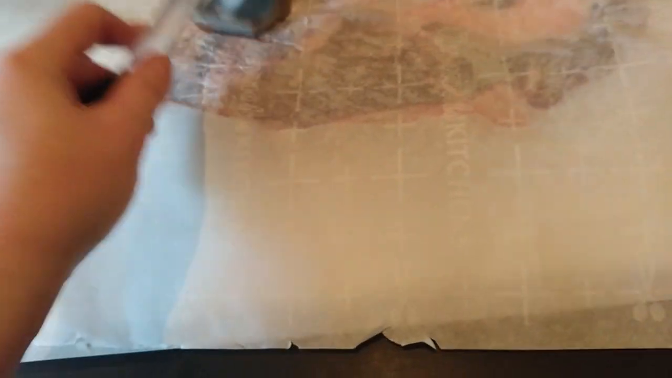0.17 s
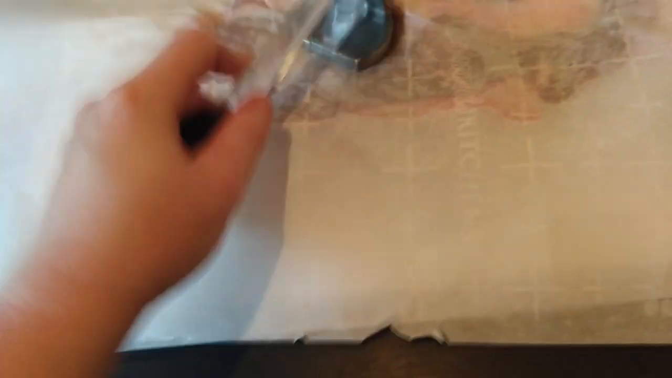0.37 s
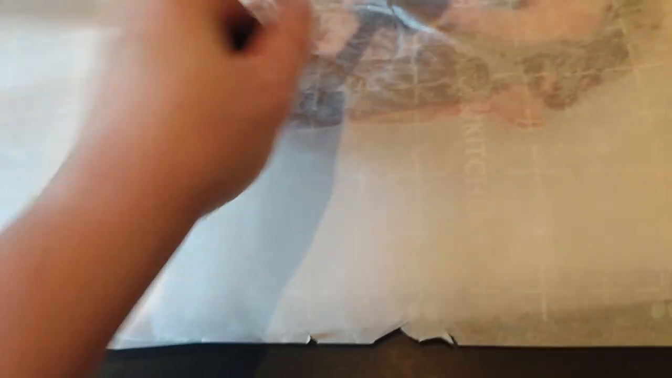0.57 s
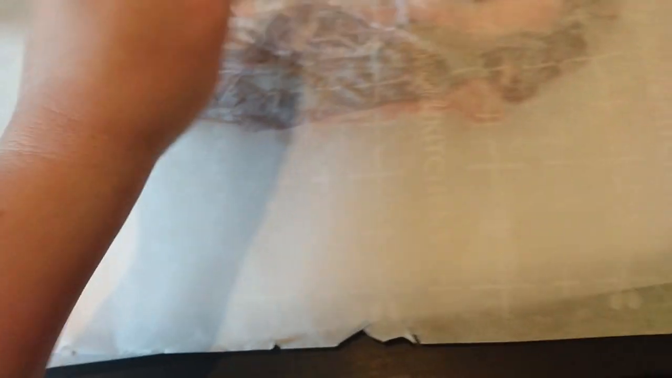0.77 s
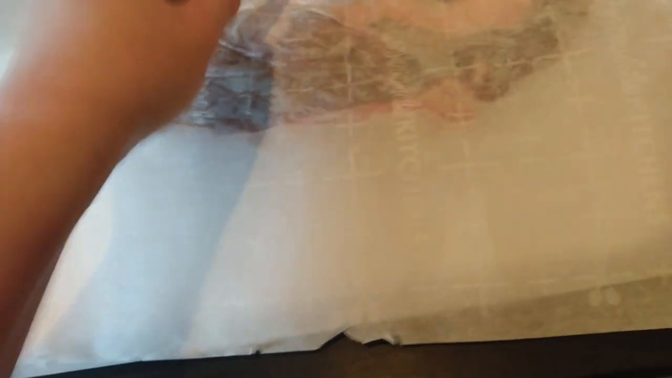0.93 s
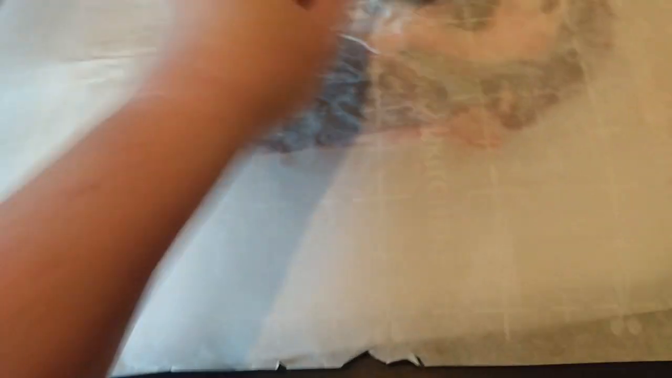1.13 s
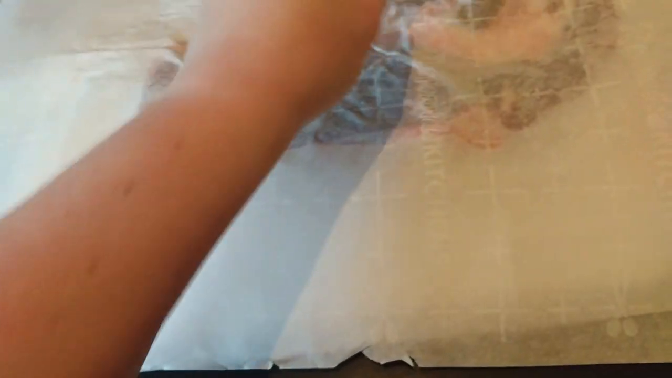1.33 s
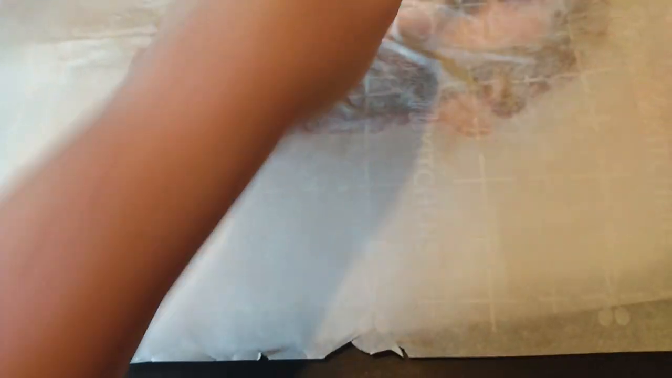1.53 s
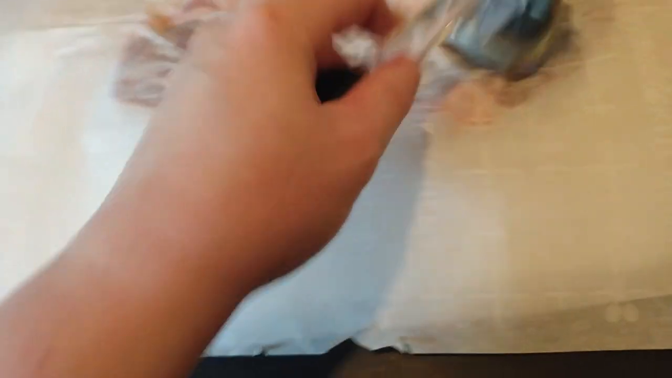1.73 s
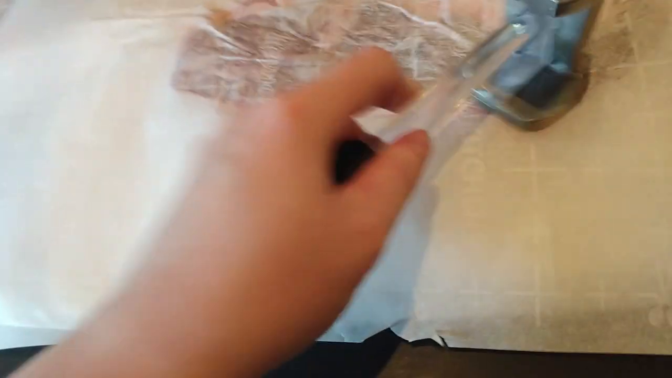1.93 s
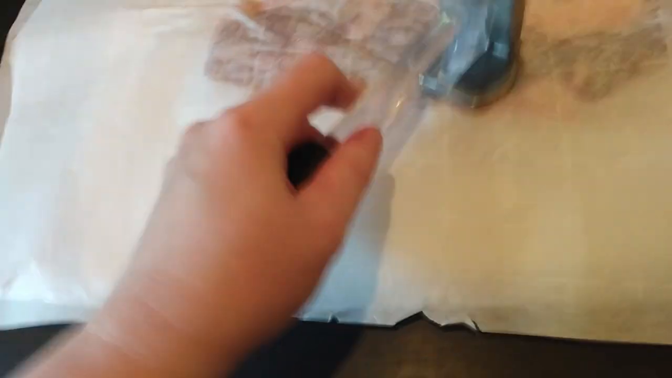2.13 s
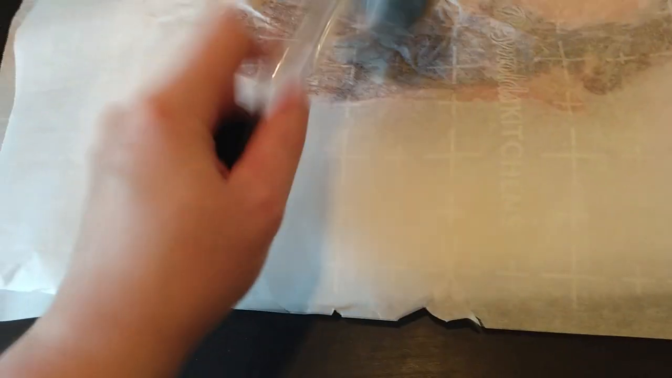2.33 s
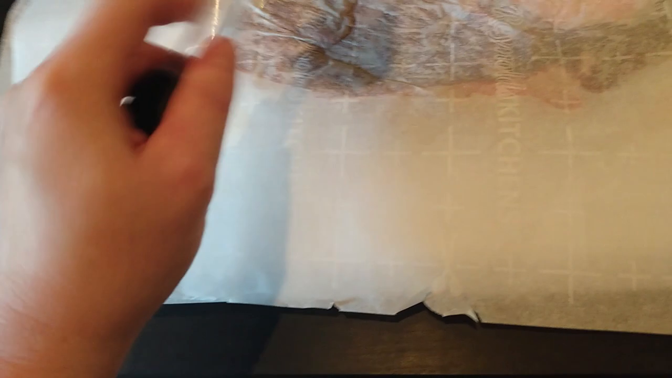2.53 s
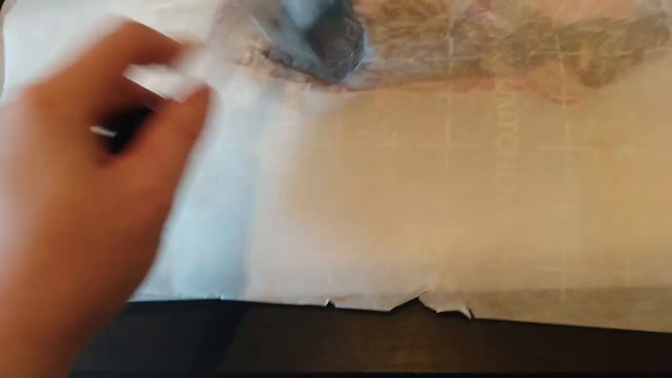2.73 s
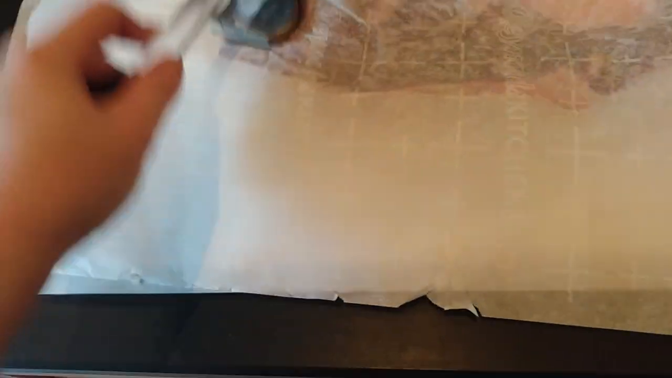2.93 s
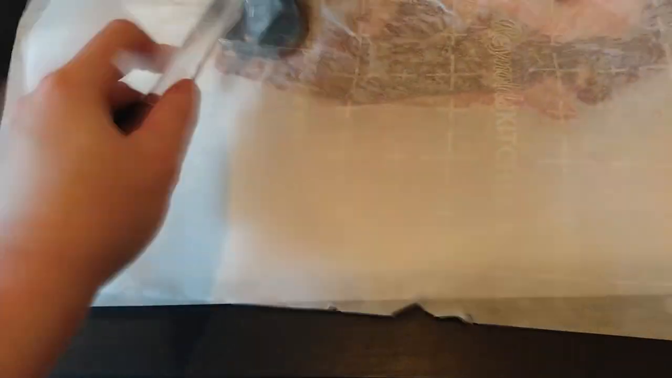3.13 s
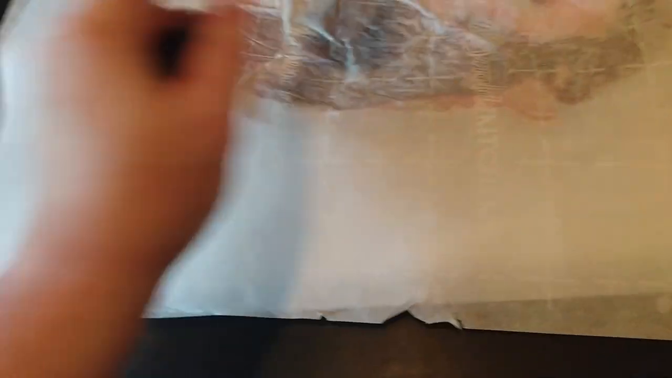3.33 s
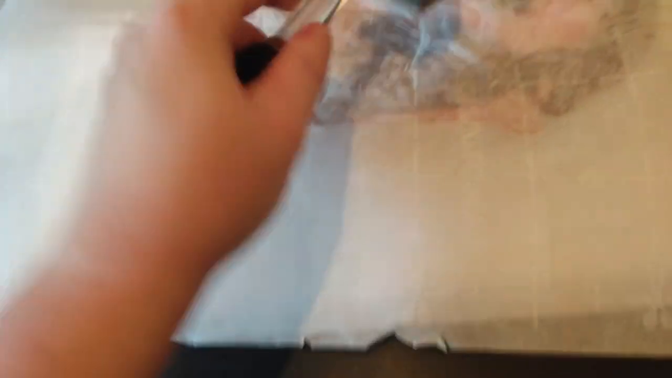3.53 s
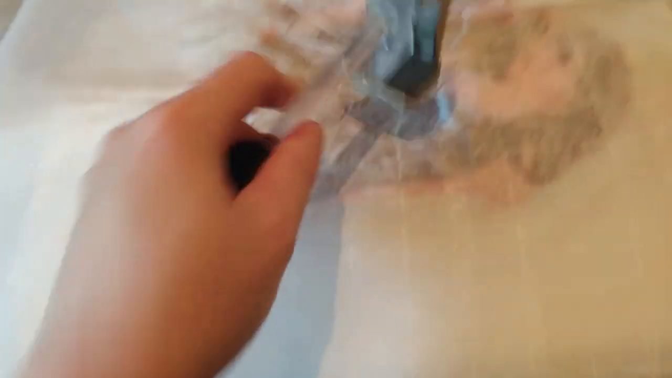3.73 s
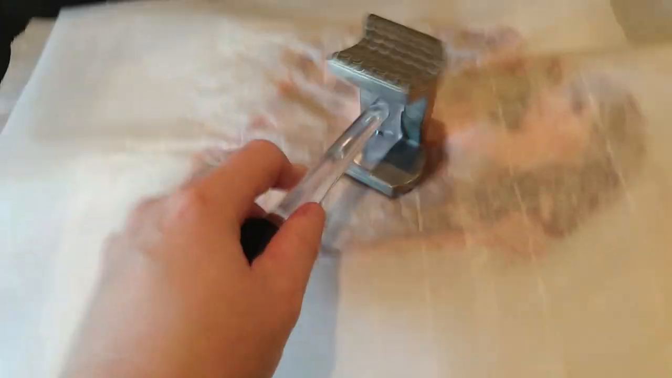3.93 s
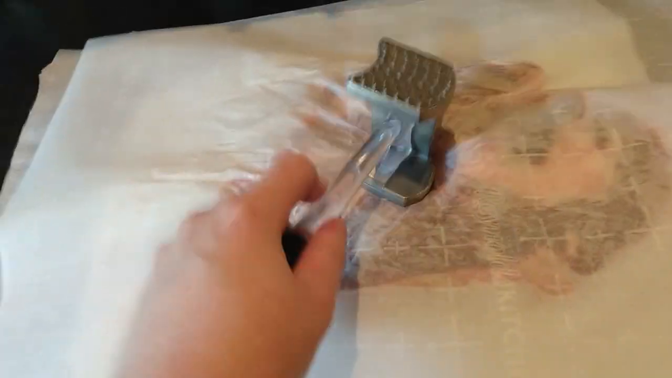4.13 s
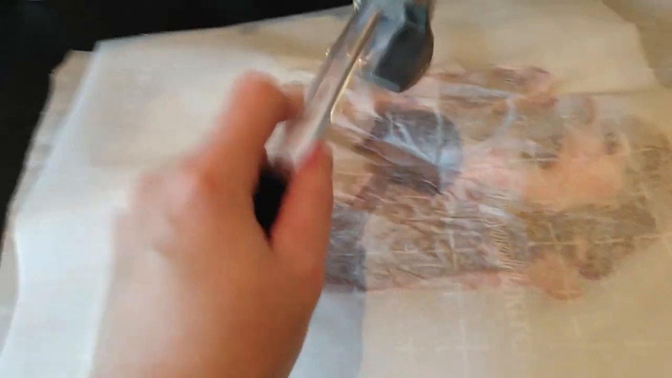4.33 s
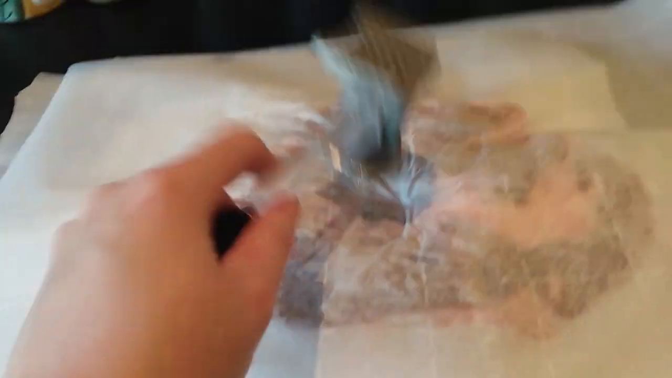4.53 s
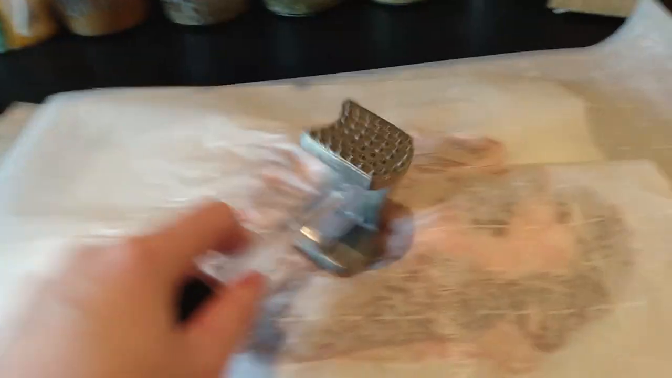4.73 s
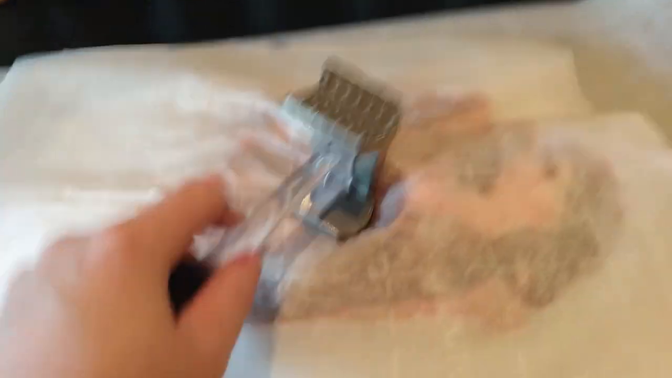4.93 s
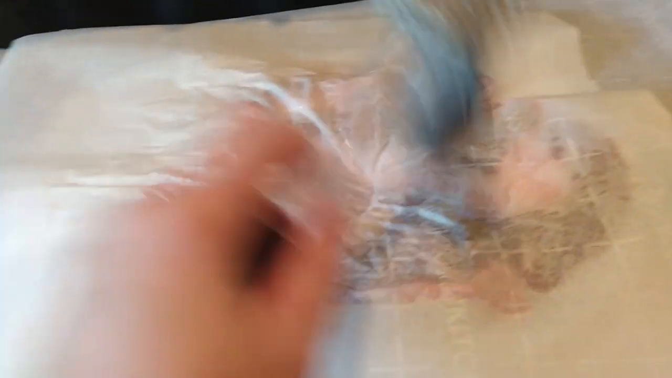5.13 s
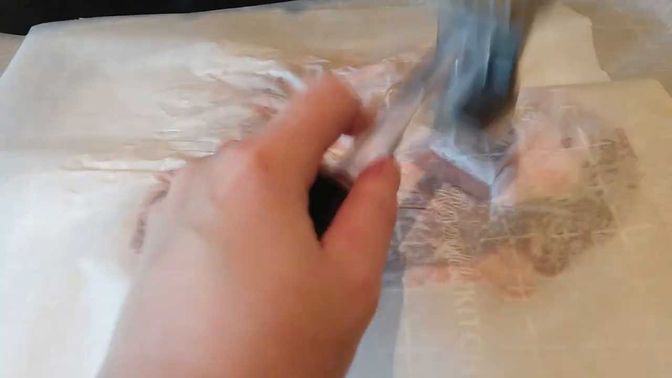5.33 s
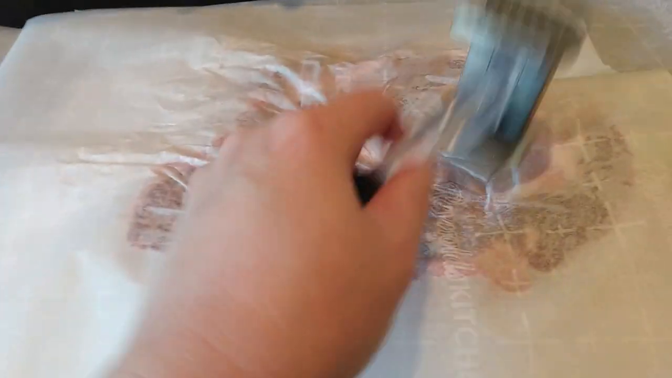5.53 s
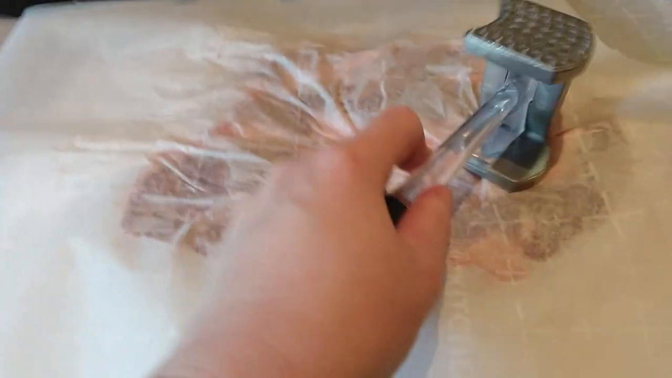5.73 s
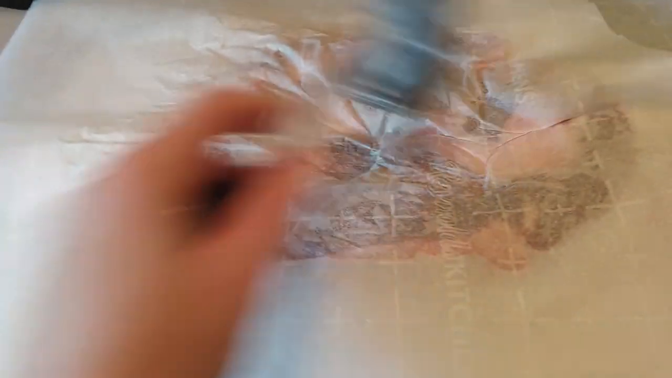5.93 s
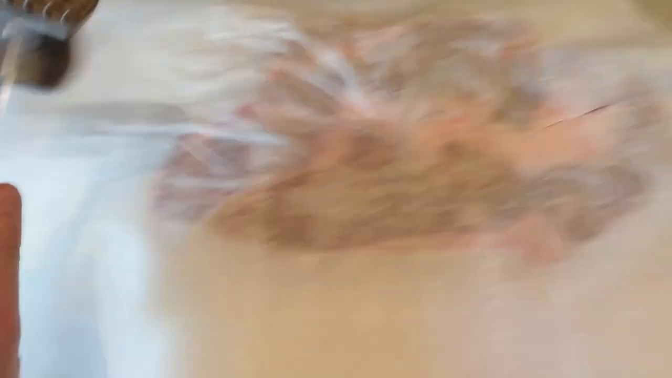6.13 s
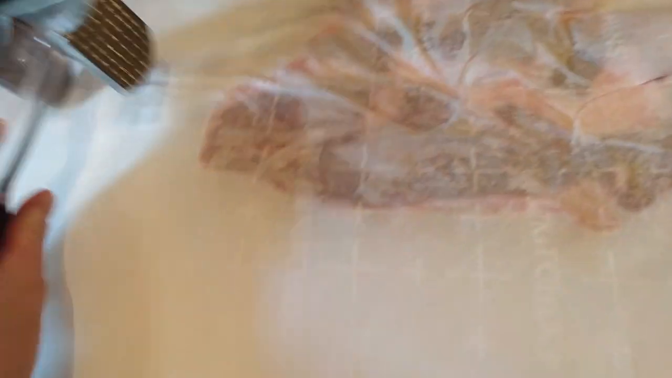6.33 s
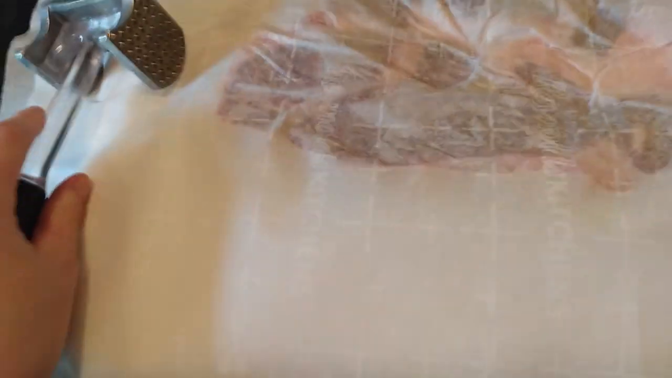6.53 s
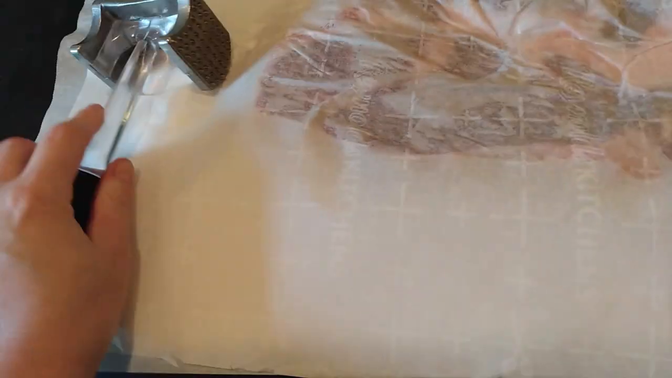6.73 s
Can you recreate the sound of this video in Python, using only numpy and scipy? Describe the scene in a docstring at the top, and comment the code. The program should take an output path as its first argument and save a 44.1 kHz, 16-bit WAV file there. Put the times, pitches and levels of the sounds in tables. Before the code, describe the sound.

A small, fairly live kitchen, heard close by on a hand-held stereo camera over a faint low rumble and hiss. From 0 to 5.8 seconds a metal mallet pounds meat between paper sheets, about every quarter second with slight human unevenness. The first blow has by far the sharpest slap. Each hit layers a flat papery smack, a hollow pop of trapped air, a brief juicy squelch, a soft low thud and a counter boom, followed some 30 milliseconds later by a small woody rebound knock. Weight varies; hits around 4 to 5 seconds are the heaviest. Single paper snaps tick among them, notably near 2.5, 3.5 and 5.3. After 5.8 the reverberation fades quickly. A light bump at 6.2, then from 6.35 to 6.9 dry paper rustles and crackles, mostly left, as the mallet is laid down, with a firmer finger bump on the camera at 6.5.

```python
"""A kitchen counter, heard close by on the two microphone ports of a hand-held camera.
A metal mallet pounds a steak between sheets of paper, about four blows a second: each slaps the paper,
pops the air under it, squeezes and thuds the meat, sets the counter booming and ends in a rebound knock.
Filtered noise makes paper, juice and room; damped sines make meat, counter and board; the kitchen answers.
Fingers bump the camera now and then; at the end the mallet is laid down on the rustling paper."""
import sys
import numpy as np
from scipy import signal
from scipy.fft import rfft, irfft, next_fast_len
from scipy.io import wavfile
from scipy.ndimage import uniform_filter1d, map_coordinates

SR = 44100
rng = np.random.default_rng(int(sys.argv[2]) if len(sys.argv) > 2 else 0)


def dump(signal):
    """Clip the signal to [-1, 1] and save it as 16-bit WAV at the path in sys.argv[1]."""
    limited = np.clip(np.atleast_2d(signal).T, -1, 1)
    pcm = np.round(limited * 32767).astype(np.int16)
    wavfile.write(sys.argv[1], SR, pcm)


N = 303849

# Mallet blows on the counter. Each row: time in seconds, relative slap level in dB, relative squelch level
# in dB, relative rebound level in dB, weight in dB over an average blow, relative brightness,
# nominal air pocket pitch in Hz.
BLOWS = [(-0.024, -2, -17.5, -24.5, 4, -3, 1460), (0.224, -21, -21, -25.5, -5, -1.5, 1430),
         (0.4705, -18, -22, -19.5, -12, 5, 1160), (0.7126, -19, -29, -27, -4, 1, 605),
         (0.9809, -18, -19.5, -20, 4, 3.5, 960), (1.2491, -20, -21, -25.5, -5.5, 3, 1310),
         (1.4832, -16.5, -23.5, -26.5, -9, 0, 1540), (1.7611, -16.5, -29, -28.5, 4, 0, 754),
         (2.0056, -15, -25.5, -29.5, -19, 0, 1140), (2.253, -16.5, -22.5, -21.5, -1, 2, 1470),
         (2.481, -22.5, -21.5, -23, -8.5, -0.5, 890), (2.7422, -17.5, -24, -20.5, 7.5, 1, 810),
         (2.9879, -18, -25, -23.5, -1, 0.5, 513), (3.2553, -16, -24, -17.5, 7, 2.5, 1360),
         (3.5269, -23, -36, -26, -5.5, 1, 486), (3.74, -21.5, -32, -27, -3, 1, 820),
         (3.9849, -17.5, -24.5, -23, 8.5, -5, 806), (4.2439, -21, -25, -25, 11, 0.5, 590),
         (4.5247, -19, -24, -18.5, 11, 0.5, 530), (4.7928, -21.5, -22, -21.5, 10, 1.5, 570),
         (5.041, -26, -20.5, -24.5, 9, 0.5, 587), (5.3023, -19, -25, -26.5, -10.5, 2, 703),
         (5.5415, -18.5, -23.5, -27.5, -10, 7, 1380), (5.8077, -15, -23, -25.5, 7, 5, 840)]
# The counter's low ring. Each row: nominal pitch in Hz, relative level in dB, 60 dB decay in seconds.
COUNTER_MODES = [(62.2, 1.5, 0.32), (93.7, -14, 0.48), (121, -8, 0.32), (159, -12, 0.4),
                 (194.7, -12.5, 0.3), (377, -11, 0.31)]
# The board under the meat. Each row: nominal pitch in Hz, relative level in dB, 60 dB decay in seconds.
BOARD_MODES = [(383, 2, 0.025), (550, -8.5, 0.032), (820, -6.5, 0.092), (1324, 3, 0.052), (1392, 6, 0.051),
               (1750, -0.5, 0.065), (2300, -5.5, 0.023)]
# Spectrum of the flat paper slap. Each row: frequency in Hz, relative level in dB.
SLAP_SPECTRUM = [(200, -16.5), (700, -7.5), (1400, -2), (2300, 4.5), (3600, -2), (6000, -2), (9000, 1.5),
                 (12000, -1.5), (16000, -10.5)]
# Spectrum of the wet folds. Each row: frequency in Hz, relative level in dB.
SQUELCH_SPECTRUM = [(300, -28.5), (900, -2.5), (1500, 1.5), (2400, 0.5), (4000, 1.5), (6000, 0),
                    (10000, -4), (16000, -19)]
# Spectrum of the puff of air under the sheet. Each row: frequency in Hz, relative level in dB.
PUFF_SPECTRUM = [(100, -26.5), (300, 5.5), (550, 2.5), (850, 3.5), (1400, -10.5), (2500, -11.5),
                 (6000, -33.5)]
# Spectrum of the board's clack on landing. Each row: frequency in Hz, relative level in dB.
CLACK_SPECTRUM = [(150, -14), (400, 0), (950, -7), (1400, -6.5), (2400, 0), (4500, -6.5), (8000, -16),
                  (16000, -32.5)]
# Spectrum of the sliding paper. Each row: frequency in Hz, relative level in dB.
PAPER_SPECTRUM = [(60, -37), (150, -28), (300, -12), (700, -8), (1500, -0.5), (2200, -2.5), (3600, 4),
                  (6000, -2), (10000, -0.5), (16000, -9)]
# Spectrum of the kitchen's steady floor. Each row: frequency in Hz, relative level in dB.
FLOOR_SPECTRUM = [(25, -13.5), (90, 15.5), (200, 4.5), (500, -22), (1100, -27), (3000, -42), (8000, -34.5),
                  (16000, -36)]
# Spectrum of skin rubbing on the camera body. Each row: frequency in Hz, relative level in dB.
FINGER_SPECTRUM = [(40, -16), (120, -2), (300, -7), (600, -4), (2000, -49)]
# How long the kitchen rings. Each row: frequency in Hz, 60 dB decay in seconds.
KITCHEN_DECAY = [(100, .35), (400, 0.35), (1000, 0.47), (2500, 0.39), (6000, 0.4142), (10000, 0.335),
                 (16000, 0.18)]
# How strongly the walls answer. Each row: frequency in Hz, relative level in dB.
WALL_RESPONSE = [(40, -3), (150, 3.5), (400, 3), (1000, -1), (3000, -0.5), (7000, -0.5), (16000, 0.5)]
# Resonance of the right microphone port. Each row: frequency in Hz, gain in dB.
RIGHT_PORT = [(60, 0), (400, -2.1), (900, -0.5), (1400, -0.5), (1900, 1.6), (2600, 6.5), (3700, 3.5),
              (4700, 8.5), (6000, 12), (8500, 8.5), (12000, 5), (16000, 2)]
# Short snaps: single paper creases, and at 6.356 s the sharp click of a finger bumping the camera. Each row:
# time in seconds, relative level in dB, centre in Hz.
SNAPS = [(0.5321, -14, 2800), (1.5614, -21, 8030), (2.033, -14, 2590), (2.0694, -11.5, 2400),
         (2.4809, -3.5, 8040), (3.527, -3.5, 8440), (3.937, -33, 8000), (4.527, -12, 7000),
         (5.301, -1.5, 6950), (5.4914, -35, 7900), (6.095, -21.5, 2830), (6.1976, -41, 8000),
         (6.356, -35, 1530), (6.4753, -21, 3500), (6.551, -6.5, 4400), (6.606, -12, 6000),
         (6.6203, -17, 5000), (6.707, -29, 5040), (6.7786, -22.5, 2520), (6.8141, -22, 4300),
         (6.846, -13, 6000)]
# The mallet pushes the paper aside. Each row: start in seconds, length in seconds, relative level in dB.
SLIDES = [(6.339, .012, -59.5), (6.45, 0.069, -35.5), (6.526, 0.032, -27), (6.583, 0.025, -36),
          (6.706, 0.051, -39.5), (6.811, 0.11, -39)]
# Finger bumps on the camera. Each row: time in seconds, relative level in dB, nominal pitch in Hz
# (a push starts near twice that pitch and sags).
BUMPS = [(4.737, -39.5, 171), (6.166, -38.5, 185), (6.357, -36, 211), (6.4825, -37.5, 188),
         (6.5124, -21.5, 332)]

T = np.arange(int(.45 * SR)) / SR  # seconds within one short event
LEAD_S = .005  # room ahead of each blow for sounds that swell up to it
# driven by the weight: (dB at average weight, dB more per dB of weight)
THUD_LAW, BOOM_LAW, POP_LAW = (-33.5, 1.0), (-32, 0.26), (-32.5, 0.38)
BOOM_APART_DB = -15.5  # the part of the boom that the two ports hear differently
# the board lands again this long after the blow, sooner as the meat gets thinner
REBOUND_S, REBOUND_SHRINK_PER_S = .0295, 0.00083
# the kitchen's share; a dry slap spreads further than a wet squelch
ROOM_SEND_DB, ROOM_PER_SLAP_DB = -8.5, 0.25
SLIDE_ATTACK_S, SLIDE_T60_S = 0.01, 0.18
CRINKLES_PER_S, CRINKLE_DB, CRINKLE_LIFE_S = 110, -0.5, 0.00046  # tiny creases give way at random
SNAP_CYCLES = 60  # a crease dies away in this many cycles, so high-pitched ones are shorter
TOP_HZ = 16100  # upper edge of the sound's band


def amp(db):
    """Decibels to gain."""
    return 10 ** (np.asarray(db) / 20)


def unit(x):
    """Scale to rms 1."""
    return x / np.sqrt(np.mean(x ** 2) + 1e-20)


def along(points, hz):
    """(Hz, value) points read on a log axis."""
    f, v = np.transpose(points)
    return np.interp(np.log(hz + 1), np.log(f), v)


def varied(points, spread_db):
    """The same colour, with its resonances stronger or weaker by chance."""
    return [(hz, db + spread_db * rng.normal()) for hz, db in points]


def driven(law, weight_db):
    """Gain of a layer that grows with the weight of the blow."""
    db, slope = law
    return amp(db + slope * weight_db)


def wobble(rate, size):
    """A smooth random curve, rate knots a second."""
    knots = rng.standard_normal(int(size * rate / SR) + 4)
    return map_coordinates(knots, [np.arange(size) * rate / SR])


def coloured(x, points, tilt_db=0):
    """Causal (minimum-phase) filter with the given spectrum, tilted by so many dB an octave above 1 kHz."""
    size = 2 * next_fast_len(x.shape[-1] // 2 + 2048)
    hz = np.fft.rfftfreq(size, 1 / SR)
    octaves = np.log2(np.maximum(hz, 1000) / 4000)
    cepstrum = irfft(np.log(amp(along(points, hz) + tilt_db * octaves)))
    # folding the cepstrum puts the whole response after time zero
    cepstrum[1:size // 2] *= 2
    cepstrum[size // 2 + 1:] = 0
    response = np.exp(rfft(cepstrum))
    return irfft(rfft(x, size) * response, size)[..., :x.shape[-1]]


def crackle(points, clumping, clump_rate, tilt_db=0, apart=.5, size=len(T)):
    """Dense noise that comes in clumps, rms 1, heard partly apart by the two ports."""
    mid, side = rng.standard_normal((2, size))
    clumps = amp(clumping * np.tanh(wobble(clump_rate, size) / 2) * 2.05)
    ports = np.array([mid + apart * side, mid - apart * side])
    return unit(coloured(ports * clumps, points, tilt_db))


def burst(peak, rise, t60):
    """An envelope that climbs 60 dB in rise seconds, peaks and dies by 60 dB in t60 seconds."""
    return amp(-60 * np.maximum((peak - T) / rise, (T - peak) / t60))


def ring(modes, start, attack, scatter_db, detune):
    """Damped modes, struck at new strengths and slightly new pitches each time."""
    t = np.maximum(T - start, 0)
    tones = 0
    for hz, db, t60 in modes:
        decay = amp(db + scatter_db * rng.normal() - 60 * t / t60)
        tones = tones + decay * np.sin(2 * np.pi * hz * (1 + detune * rng.normal()) * t)
    return tones * (1 - np.exp(-t / attack))


def thump(start, hz, t60, sag):
    """A soft push of a few cycles whose pitch sags from hz as the contact relaxes."""
    t = np.maximum(T - start, 0)
    return -np.sin(2 * np.pi * hz * sag * np.log1p(t / sag)) * amp(-60 * t / t60)


def add(track, s, x):
    """Mix x into track from time s on."""
    i = round(s * SR)
    x = x[..., max(-i, 0):max(N - i, 0)]
    track[..., max(i, 0):max(i, 0) + x.shape[-1]] += x


def room_tone():
    """The faint steady rumble and hiss of the kitchen, partly common to both ports."""
    common, *own = unit(coloured(rng.standard_normal((3, N)), FLOOR_SPECTRUM))
    return amp(-75.0) * common + amp(-70.5) * np.array(own)


def paper_slap(slap_db, bright):
    """The loose paper crumples for a moment, then the head lands flat on it."""
    crumple = amp(-15.5) * burst(LEAD_S, 0.0047, 0.0017)
    contact = crumple + burst(LEAD_S + 0.0018, 0.006, 0.053)
    noise = crackle(varied(SLAP_SPECTRUM, spread_db=1.6), clumping=3.0, clump_rate=1850,
                    tilt_db=0.57 * bright - 0.92, apart=0.71)
    return amp(slap_db + 2) * noise * contact


def air_pop(weight_db, pocket_hz):
    """The air pocket under the sheet puffs and pops close to its own pitch."""
    puff = crackle(PUFF_SPECTRUM, clumping=1.5, clump_rate=1000, apart=0.25)
    puff = amp(-0.5) * puff * burst(LEAD_S + 0.0014, 0.0055, 0.083)
    pocket = ring([(pocket_hz, 1.5, .045)], LEAD_S, attack=0.0029, scatter_db=6.5, detune=0.034)
    return driven(POP_LAW, weight_db) * (puff + pocket)


def wet_squelch(squelch_db, bright):
    """Juice and air squeeze out through folds that resonate anew at each blow."""
    noise = crackle(varied(SQUELCH_SPECTRUM, spread_db=2), clumping=2, clump_rate=489,
                    tilt_db=0.47 * bright - 0.34, apart=1.0)
    landed = np.clip((T - LEAD_S) / .002, 0, 1)
    return amp(squelch_db + 1) * noise * landed * burst(LEAD_S + 0.01, 0.038, 0.12)


def meat_thud(weight_db):
    """The meat gives way in one low push whose pitch differs from blow to blow."""
    start_hz = 255 * np.exp(0.16 * rng.normal())
    return driven(THUD_LAW, weight_db) * thump(LEAD_S + 0.00427, hz=start_hz, t60=0.046, sag=0.016)


def counter_boom(weight_db):
    """The counter's low modes swell and ebb as they beat with the room's standing waves."""
    beat = 1 + .5 * np.cos(2 * np.pi * 13 * (T - .05))
    common = ring(COUNTER_MODES, LEAD_S + 0.0015, attack=0.018, scatter_db=1.5, detune=.02)
    between = ring(COUNTER_MODES, LEAD_S + .005, attack=0.011, scatter_db=2.0, detune=.06)
    between = amp(BOOM_APART_DB) * between
    return driven(BOOM_LAW, weight_db) * beat * np.array([common + between, common - between])


def board_rebound(s, rebound_db):
    """The board jumps and lands again with a ringing knock and a noisy clack."""
    landing = LEAD_S + REBOUND_S - REBOUND_SHRINK_PER_S * s
    knock = amp(-9.5) * ring(BOARD_MODES, landing, attack=0.002, scatter_db=1.5, detune=0.04)
    clack = crackle(CLACK_SPECTRUM, clumping=5.5, clump_rate=1200, apart=0.27)
    clack = amp(-1.5) * clack * burst(landing + 0.0031, 0.03, 0.056)
    return amp(rebound_db) * (knock + clack)


def mallet():
    """Every blow on the counter, heard directly and through the kitchen; the boom is heard only directly."""
    direct, to_room = np.zeros((2, 2, N))
    for s, slap_db, squelch_db, rebound_db, weight_db, bright, pocket_hz in BLOWS:
        blow = paper_slap(slap_db, bright) + air_pop(weight_db, pocket_hz)
        blow = blow + wet_squelch(squelch_db, bright) + meat_thud(weight_db)
        blow = blow + board_rebound(s, rebound_db)
        add(direct, s - LEAD_S, amp(0.5) * blow + counter_boom(weight_db))
        dryness_db = slap_db - squelch_db - 9.5
        add(to_room, s - LEAD_S, amp(ROOM_SEND_DB + ROOM_PER_SLAP_DB * dryness_db) * blow)
    return direct + kitchen(to_room)


def kitchen(x, lag_s=.007, apart_hz=250, apart=0.97, patchy_db=1.5):
    """Diffuse room answer: the energy put into each band dies away at that band's own speed."""
    hz, t, z = signal.stft(x, SR, nperseg=256)
    fed = np.abs(uniform_filter1d(np.mean(np.abs(z) ** 2, axis=0), size=3, axis=0))
    keep = amp(-60 * t[1] / along(KITCHEN_DECAY, hz)) ** 2  # energy kept from frame to frame
    energy = np.array([signal.lfilter([1 - k], [1, -k], band) for k, band in zip(keep, fed)])
    noise = signal.stft(rng.standard_normal(x.shape), SR, nperseg=256)[2]
    # echoes arrive in uneven bunches
    patches = uniform_filter1d(rng.standard_normal(energy.shape), size=3, axis=0)
    patches = uniform_filter1d(patches, size=8, axis=1)
    noise = noise * amp(patchy_db * unit(patches))
    field = noise / np.std(noise) * np.sqrt(2 * energy) * amp(along(WALL_RESPONSE, hz))[:, None]
    # both ports hear the bass alike
    turn = apart * np.pi / 4 * hz / np.hypot(hz, apart_hz)
    shares = np.array([np.cos(turn), np.sin(turn)])[..., None]
    mid, side = signal.istft(field * shares, SR, nperseg=256)[1]
    out = np.zeros((2, N))
    add(out, lag_s, np.array([mid + side, mid - side]))
    return out


def paper_rustle(now):
    """The sheet sticks and slips under the sliding mallet while tiny creases give way."""
    sliding = 0
    for s, length, db in SLIDES:
        before, after = (s - now) / SLIDE_ATTACK_S, (now - s - length) / SLIDE_T60_S
        sliding = sliding + amp(db - 60 * np.maximum(np.maximum(before, after), 0))
    catches_db = 2.8 * wobble(90, N)
    ticks = (rng.random(N) < CRINKLES_PER_S / SR) * rng.rayleigh(size=N)
    fade = np.exp(-1 / (CRINKLE_LIFE_S * SR))
    crinkles = amp(CRINKLE_DB) * signal.lfilter([1], [1, -fade], ticks)
    noise = crackle(PAPER_SPECTRUM, clumping=1, clump_rate=900, apart=1.0, size=N)
    return sliding * amp(catches_db) * unit(1 + crinkles) * noise


def paper_snap(db, hz):
    """One crease snaps, or a finger clicks: a very short burst of noise around its centre frequency."""
    crease = [(hz / 20, -16), (hz / 4, -6), (hz / 2, -4), (hz, 0), (hz * 2, -6), (hz * 10, -18)]
    noise = crackle(crease, clumping=4.5, clump_rate=1500, apart=0.87)
    return amp(db - 8.5) * noise * burst(0.0011, 0.00072, SNAP_CYCLES / hz)


def paper():
    """Creases snap singly, a finger clicks on the camera at 6.356 s, and the sheet rustles as the mallet slides
    onto it at the left."""
    now = np.arange(N) / SR
    sheet = paper_rustle(now)
    for s, db, hz in SNAPS:
        add(sheet, s, paper_snap(db, hz))
    left, right = sheet + amp(-10.5) * kitchen(sheet)
    # once the mallet is off to the left, the camera shades the right port
    aside = np.interp(now, [6.1, 6.4], [0, 1])
    shaded = coloured(right, [(500, 2.0), (2500, -4.5), (6000, -10.5), (14000, -10.0)])
    return np.array([left, right + aside * (shaded - right)])


def handling():
    """Finger bumps reach both ports through the camera body, each with a short rub of skin."""
    out = np.zeros((2, N))
    lead = .03  # seconds of rub ahead of the bump
    for s, db, hz in BUMPS:
        pressed = np.clip((T - lead) * hz / 0.27, 0, 1)
        push = amp(db + 7) * thump(lead, hz=2 * hz, t60=6.0 / hz, sag=0.47 / hz) * pressed
        skin = crackle(FINGER_SPECTRUM, clumping=-5, clump_rate=240, apart=0.25)
        rub = amp(db - 18.5) * skin * burst(lead, 0.091, 0.11)
        add(out, s - lead, push + rub)
    return out


def scene():
    """Everything at the two microphone ports."""
    return room_tone() + mallet() + paper() + handling()


def record(dry):
    """The right port colours the treble; peaks near full scale are rounded off and the extreme treble is cut."""
    ports = np.array([dry[0], coloured(dry[1], RIGHT_PORT)])
    ports = ports / (1 + (ports / .95) ** 6) ** (1 / 6)
    size = next_fast_len(N + SR)
    passed = 1 / (1 + (np.fft.rfftfreq(size, 1 / SR) / TOP_HZ) ** 120)
    return irfft(rfft(ports, size) * passed, size)[:, :N]


dry = scene()
out = record(dry)
dump(out)
```